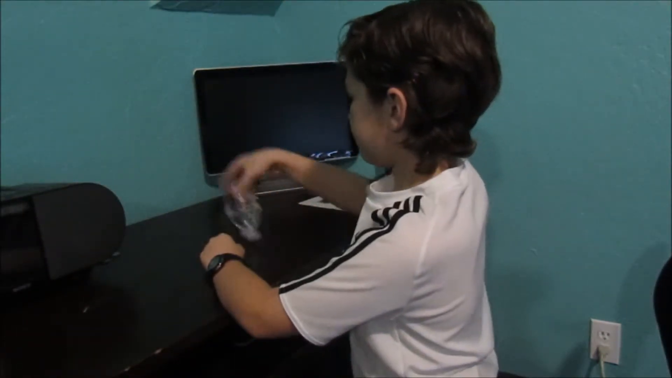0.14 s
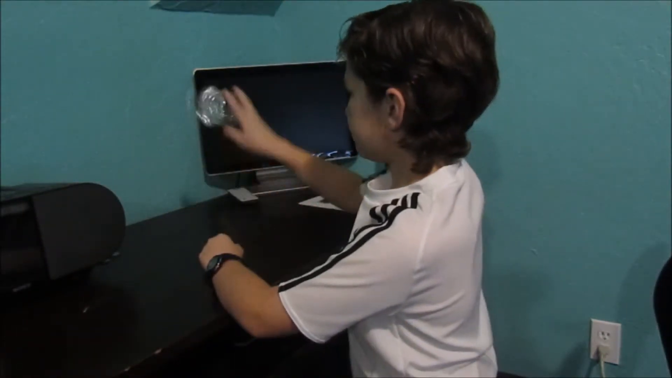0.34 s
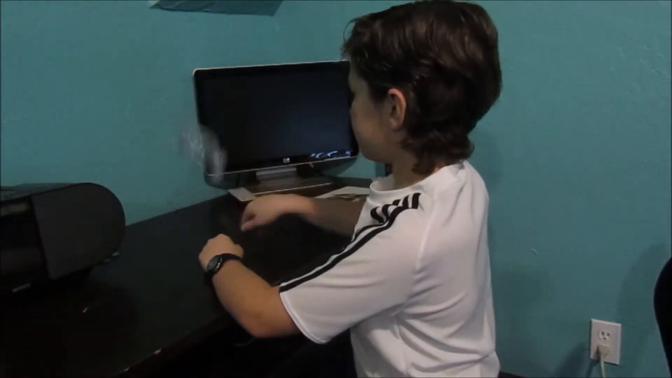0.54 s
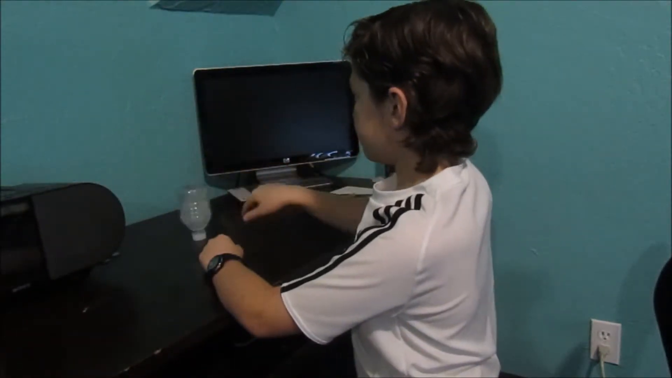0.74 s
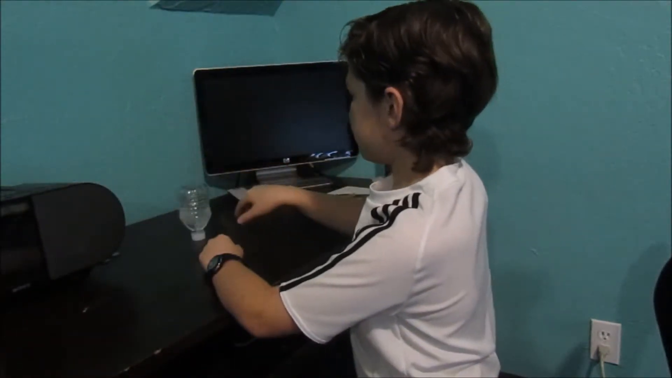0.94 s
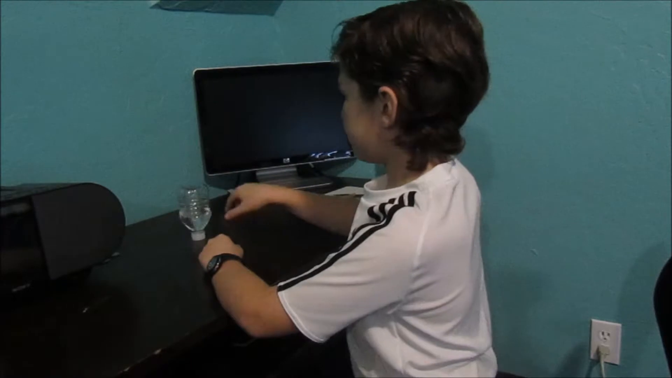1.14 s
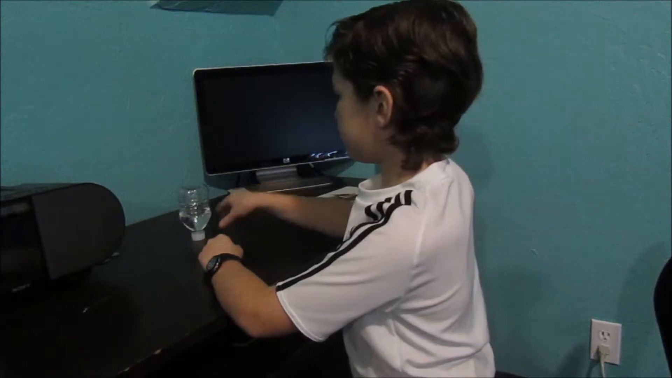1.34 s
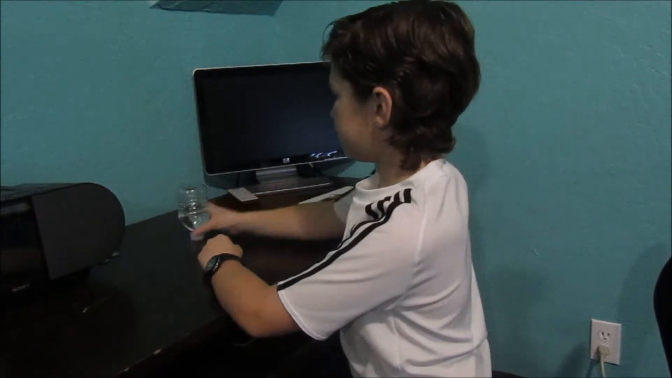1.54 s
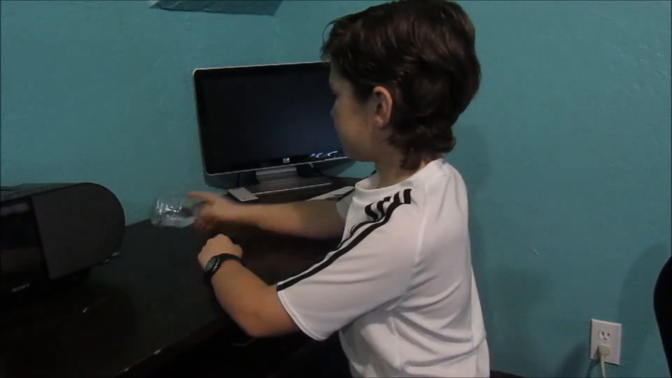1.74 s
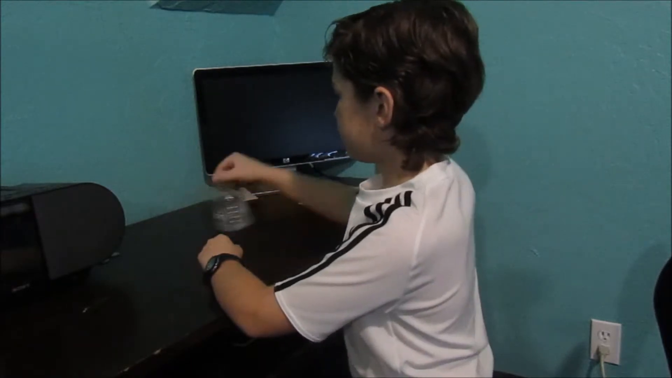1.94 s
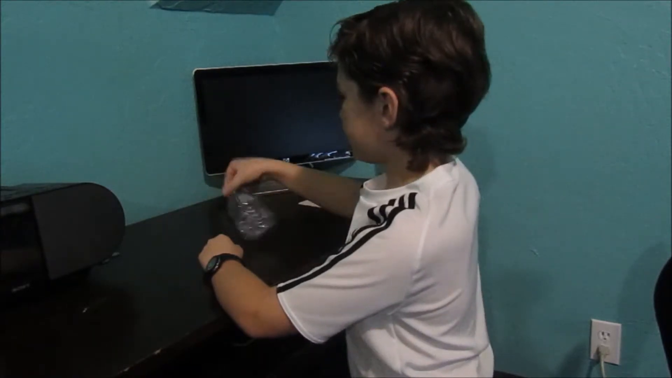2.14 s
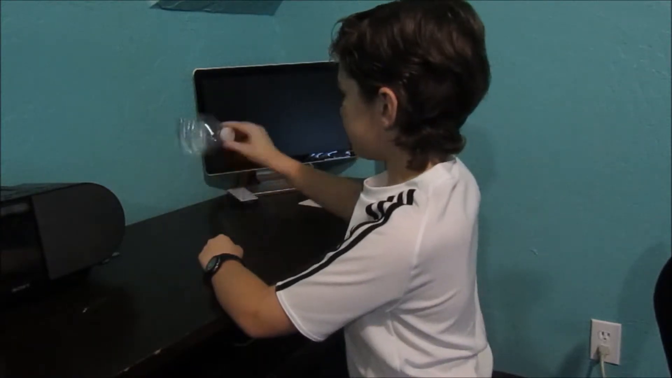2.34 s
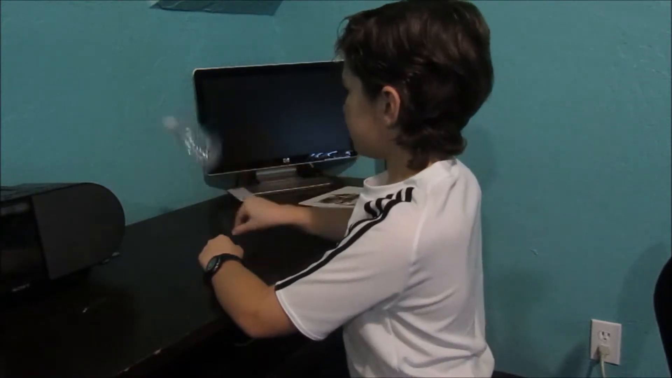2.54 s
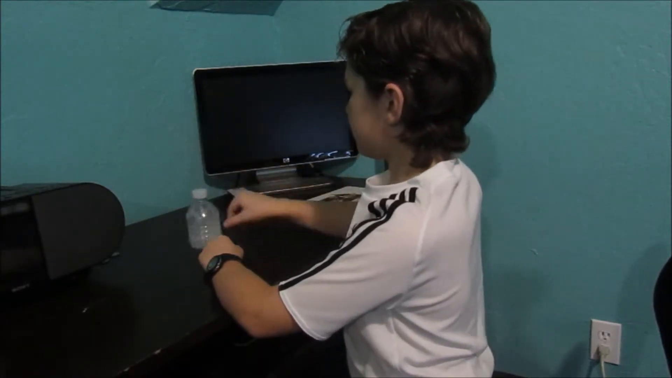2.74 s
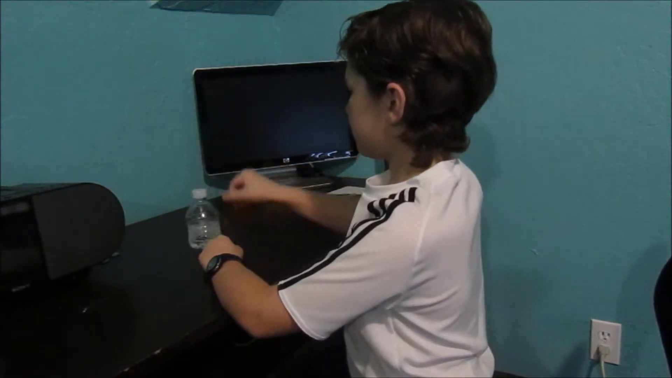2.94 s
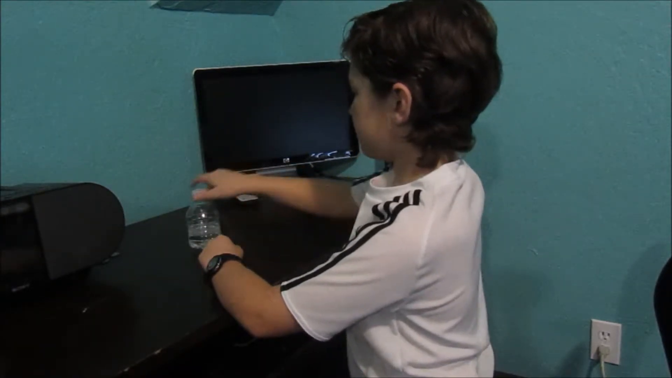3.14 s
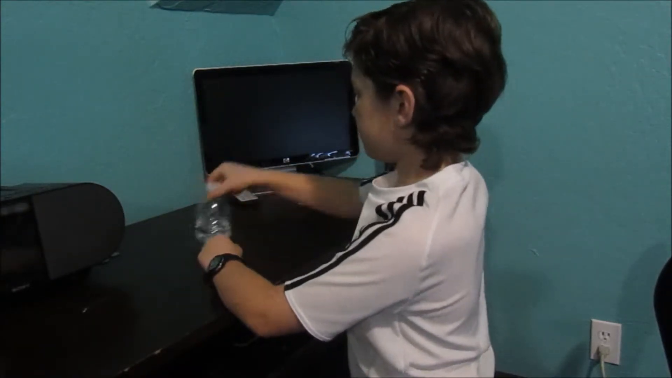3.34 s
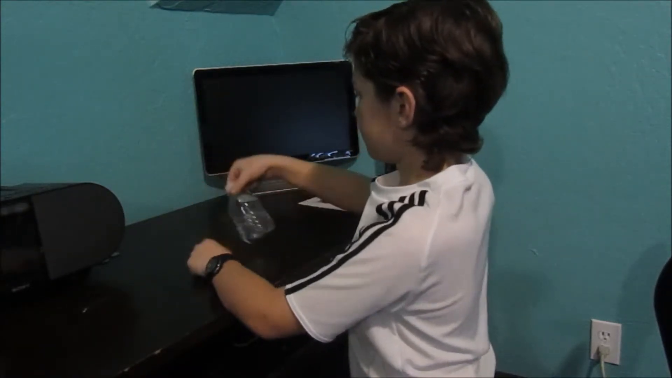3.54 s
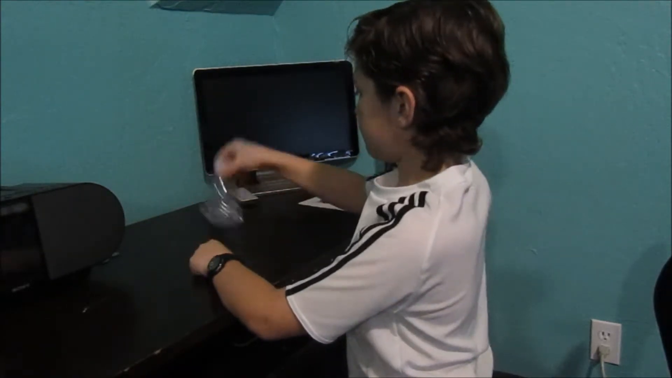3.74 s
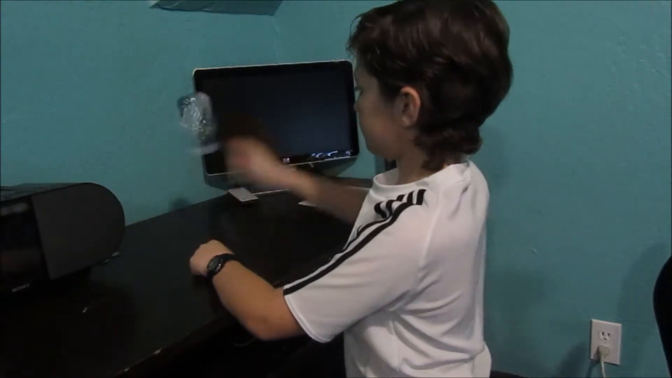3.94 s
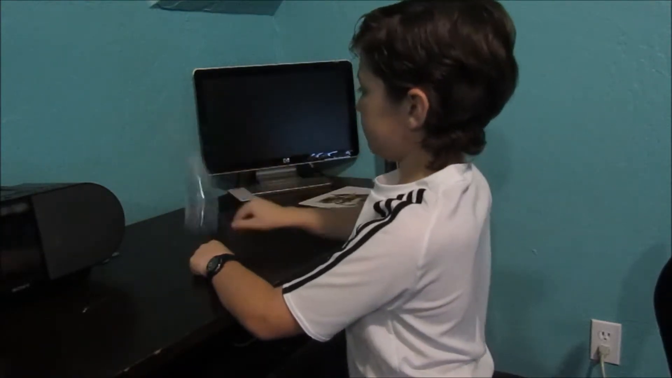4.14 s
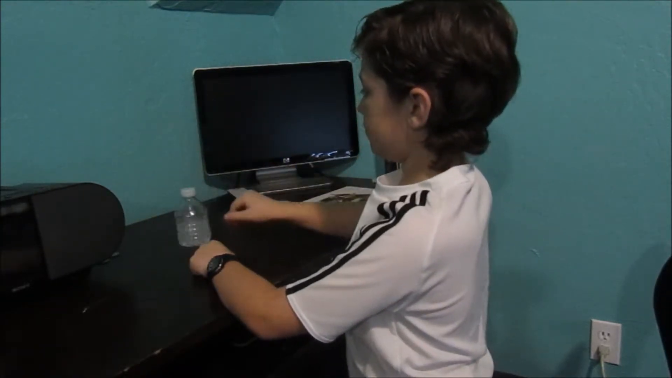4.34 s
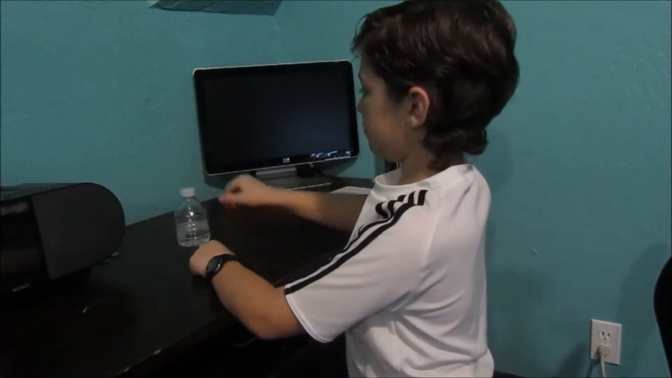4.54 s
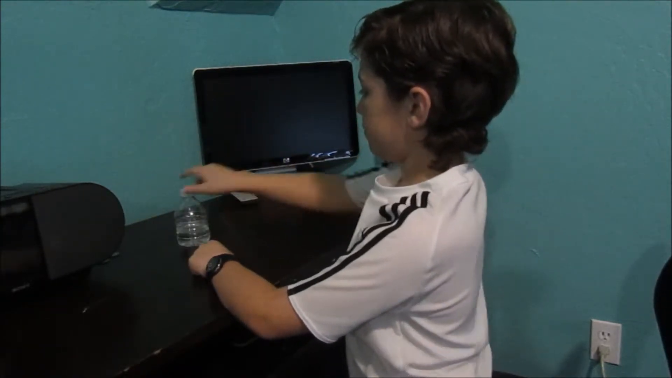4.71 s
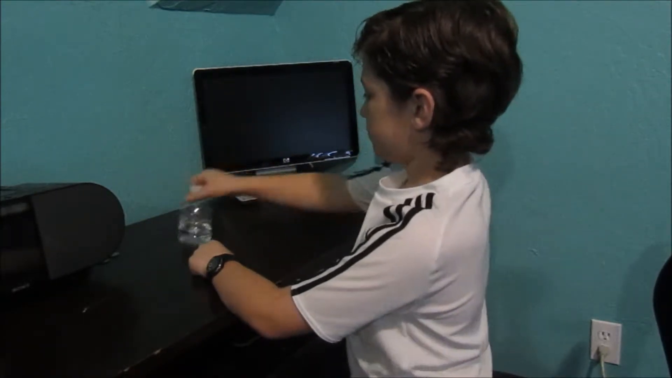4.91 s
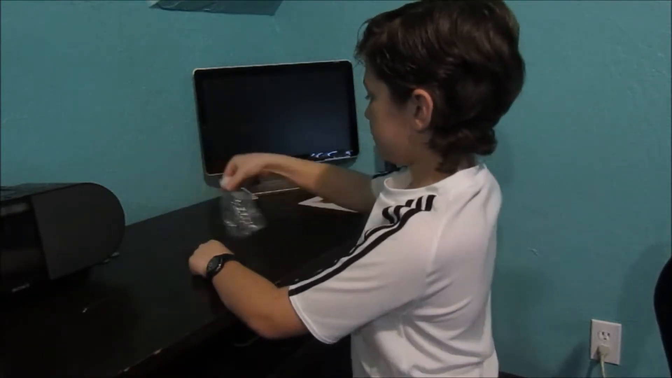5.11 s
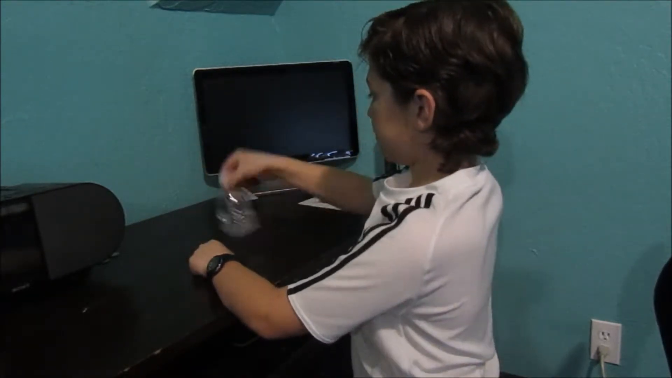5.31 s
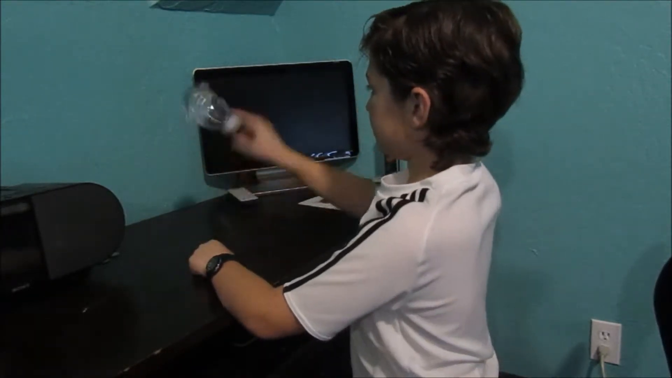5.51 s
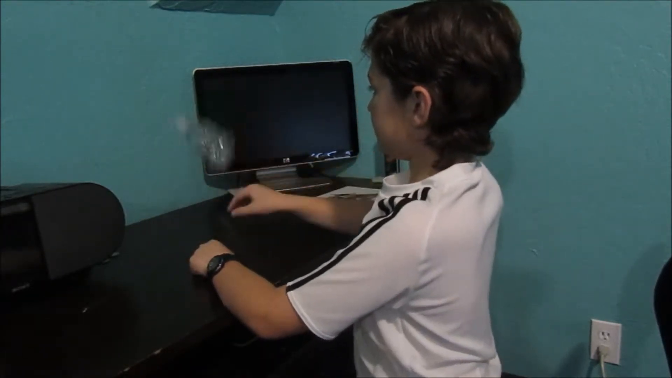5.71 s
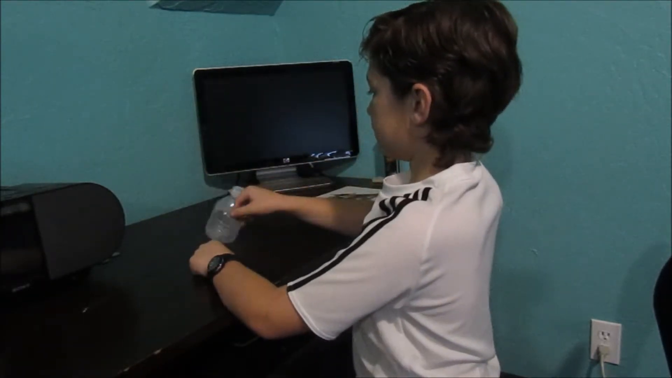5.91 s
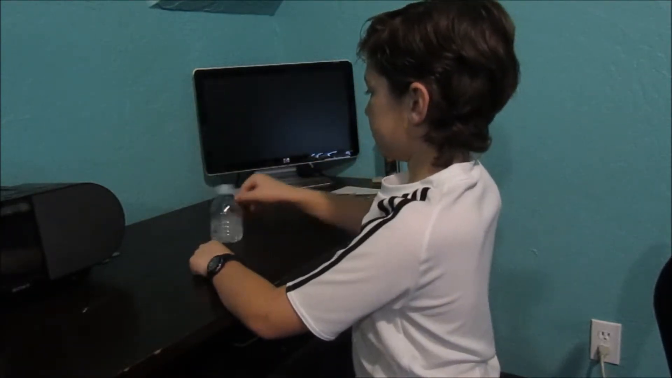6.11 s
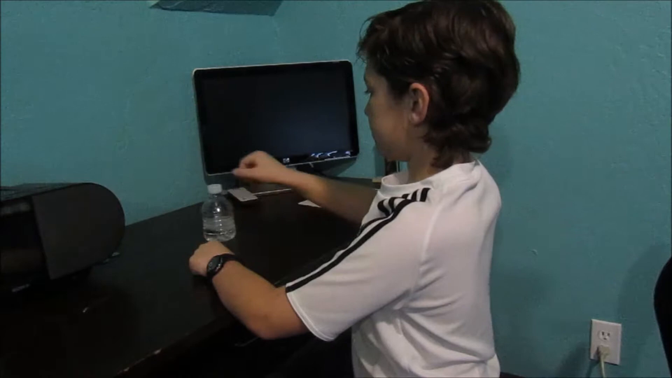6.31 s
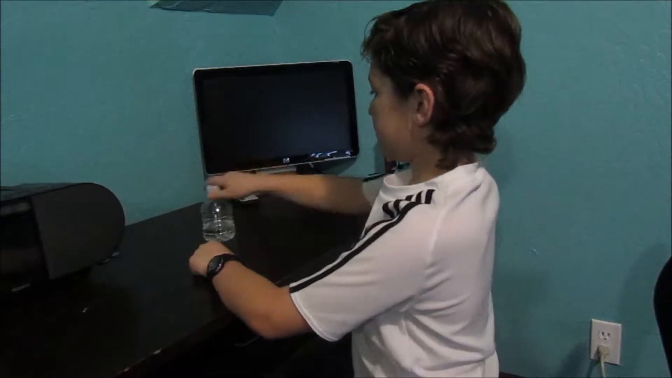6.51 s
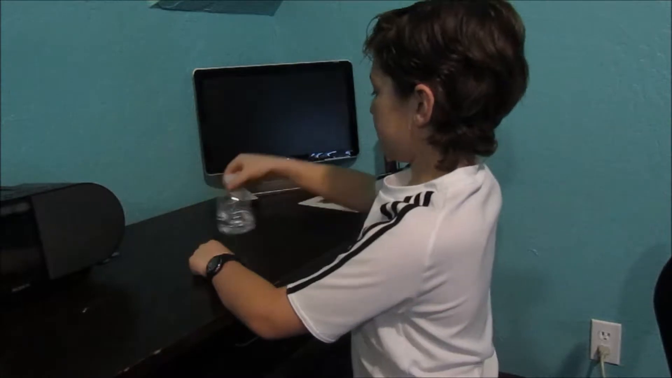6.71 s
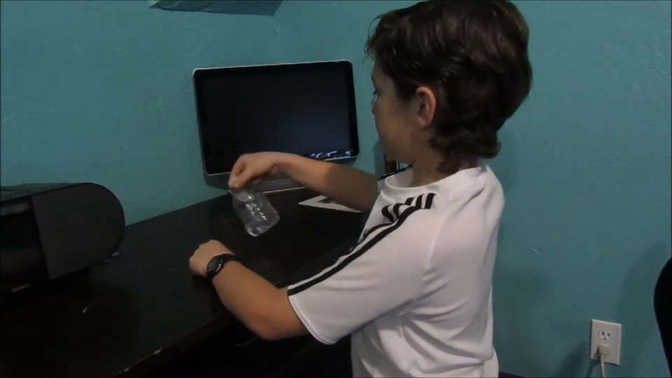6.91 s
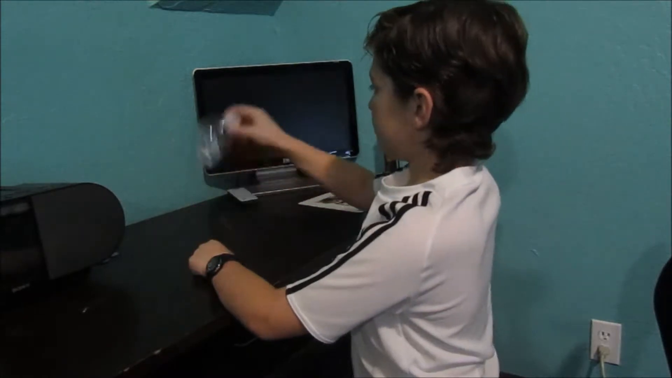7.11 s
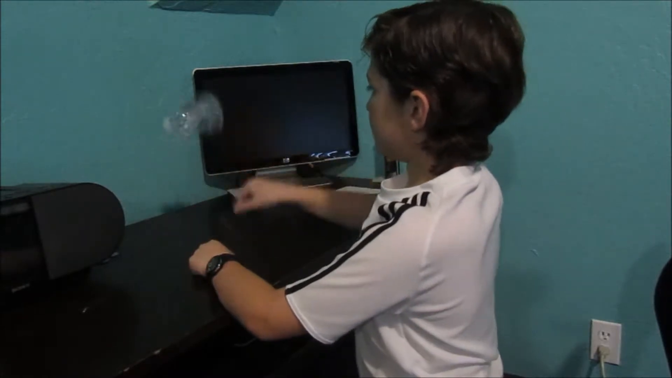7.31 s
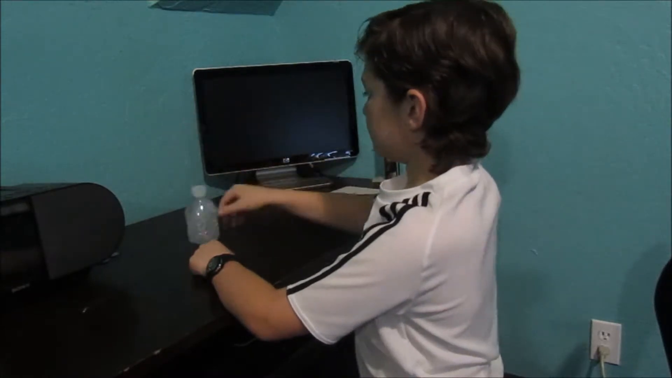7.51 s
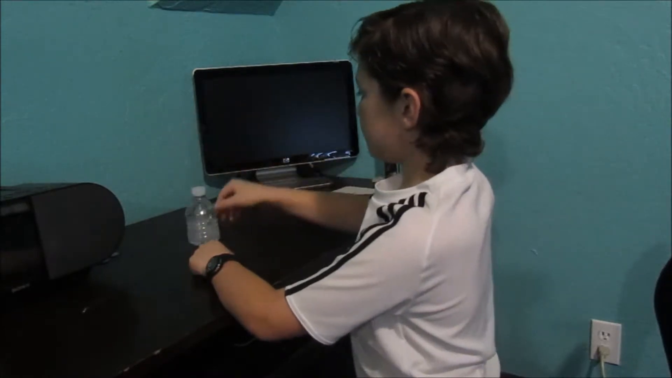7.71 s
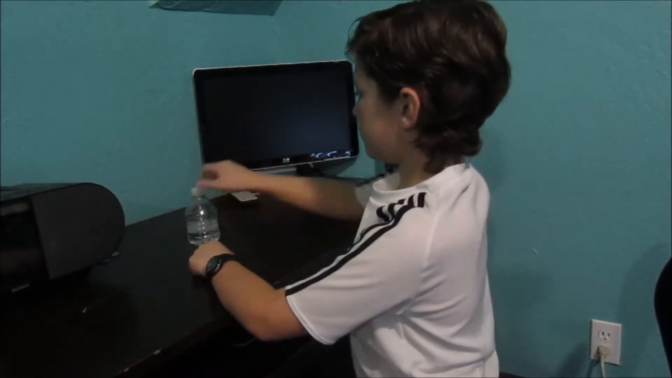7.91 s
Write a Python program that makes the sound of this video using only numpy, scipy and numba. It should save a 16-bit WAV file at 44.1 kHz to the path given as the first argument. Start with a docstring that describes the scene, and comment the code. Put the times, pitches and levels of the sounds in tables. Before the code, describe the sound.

A small camera close by in a bare-walled room picks up low hiss, a very faint high whine and tiny paired lens-motor ticks throughout. A knock and low hollow boom fade at the very start. At 0.45 s water slaps inside a plastic bottle, and at 0.6 s it hits the wooden desk with the loudest, sharpest crack. Hands brush the wood at 1.5 s, thin plastic crinkles from 1.8 to 1.95 s. A click of release at 2.4 s leads to a fuller thud at 2.65 s. Soft taps follow near 3.1 and 3.5 s; water surges at 4.1 s into a landing at 4.17 s with quick rocking knocks. Another slap at 5.7 s, thump at 5.84 s, lighter double knock around 6.16 s. Plastic snaps near 7 s, a slap at 7.37 s, final bright thud at 7.5 s, small crinkles, a faint hand bump at 8 s. Each hit has a short rattle and echo.

```python
"""Bottle flips on a desk

A part-filled plastic bottle is flipped five times and lands on a wooden desk in a small bare room.
Blows ring the desk panel, the thin wall cracks and clicks, water slaps inside, hands thump the wood:
each is a short push or noise burst that rings decaying resonances. A small camera adds hiss, a whine and
double ticks; its gain control ducks when the sound is loud and creeps back."""
import sys
import numpy as np
from scipy import signal
from scipy.fft import rfft, irfft
from scipy.io import wavfile
from scipy.ndimage import uniform_filter1d, map_coordinates
from numba import njit

SR = 44100
rng = np.random.default_rng(int(sys.argv[2]) if len(sys.argv) > 2 else 0)


def ratio(d):
    """dB to gain"""
    e = np.asarray(d, float) / 20
    return 10 ** e


def wav_out(sig):
    """Save sig, one row per channel (or a flat mono array), as 16-bit PCM at SR to the path in sys.argv[1]."""
    wavfile.write(sys.argv[1], SR, np.round(np.clip(np.atleast_2d(sig).T, -1, 1) * 32767).astype(np.int16))


N = 355446  # samples in the scene


def colour(x, points):
    """Filter with the gains of (pitch_hz, level_db) points; it never answers before its input."""
    hz, db = np.transpose(points)
    grid = np.arange(1, 4098) * SR / 8194
    log_gain = np.interp(np.log(grid), np.log(hz), db) * np.log(10) / 20
    # folding the cepstrum forward puts the whole response after its input
    cepstrum = irfft(log_gain)
    cepstrum[1:4096] *= 2
    cepstrum[4097:] = 0
    return signal.fftconvolve(x, irfft(np.exp(rfft(cepstrum))))[:len(x)]


def ring(x, modes):
    """Sum of decaying resonances, neighbours in opposite sign; t60_s is the time to fall by 60 dB."""
    out = 0
    for k, (hz, db, t60) in enumerate(modes):
        pole = np.exp(2j * np.pi * hz / SR - np.log(1000) / (t60 * SR))
        resonance = signal.lfilter([1], [1, -pole], x).imag
        out = out + (-1) ** k * ratio(db) * resonance
    return out


def vary(modes, amount=1):
    """The same modes under another grip or load: each a little higher or lower, stronger or weaker."""
    chance = amount * rng.standard_normal((len(modes), 2))
    return [(hz * (1 + 0.04 * u), db + 3 * v, t60) for (hz, db, t60), (u, v) in zip(modes, chance)]


def band(x, hz, octaves):
    """Band-pass around hz, rms kept near 1 for white noise."""
    low = hz * 2 ** (-octaves / 2)
    high = min(hz * 2 ** (octaves / 2), SR / 2.2)
    sos = signal.butter(2, [low, high], "band", fs=SR, output="sos")
    return signal.sosfilt(sos, x) / np.sqrt(2 * (high - low) / SR)


def add(track, s, x):
    """Mix x into track from time s in seconds."""
    i = int(s * SR)
    track[i:i + len(x)] += x[:max(len(track) - i, 0)]


def push(ms):
    """Contact force: a smooth hump of unit area; softer contact lasts longer."""
    hump = np.sin(np.pi * np.clip(np.arange(1024) / (ms * SR / 1000), 0, 1)) ** 2
    return hump / hump.sum()


def fade(ms):
    """Exponential die-away, down to 37 % after ms."""
    return np.exp(-np.arange(8192) / (ms * SR / 1000))


def crackle(shape):
    """Noise under a loudness shape, evened out so that no pitch stands out."""
    x = rng.standard_normal(len(shape)) * shape
    for _ in range(5):
        spectrum = rfft(x)
        flat = irfft(spectrum / np.abs(spectrum))
        loudness = np.sqrt(np.abs(uniform_filter1d(flat ** 2, size=48)) + 1e-12)
        x = shape * flat / loudness
    return flat * (shape > 1e-3) * np.sqrt(np.sum(shape ** 2))


# hollow boom dying away from the start, pitch and level before small random changes:
# pitch_hz [Hz], level_db [dB], t60_s [s]
BOOM_MODES = [(111.5, -39, .4), (222, -26, 0.31), (281, -19, 0.26), (302, -39, 0.37), (430, -29.5, 0.25),
              (540, -32.5, 0.29)]


def opening_boom():
    """A few low rings, already sounding at the first moment, that only decay."""
    start = np.zeros(N)
    start[0] = 1
    return ring(start, vary(BOOM_MODES, 0.5))


# relative colour of room air and camera hiss: pitch_hz [Hz], level_db [dB per Hz]
HISS_COLOUR = [(15, -9), (40, 9), (105, -3), (160, -4), (330, -7), (700, -11.5), (1300, -10.5),
               (1700, -16.5), (3000, -21.5), (7300, -24), (11000, -30.5), (16000, -38)]
# narrow bands of noise: pitch_hz [Hz], width_hz [Hz], level_db [dB]
HUMS = [(103.7, 8.9, -69), (395.8, 18, -75), (1149, 66, -70)]
HISS_DB = -58.5
WHINE_HZ, WHINE_DRIFT_HZ, WHINE_DB = 11770, 12, -83  # the drift and the level are rms


def hush():
    """Smooth hiss with a few narrow hums and a thin high whine that drifts a little."""
    air = colour(rng.standard_normal(N), HISS_COLOUR)
    out = ratio(HISS_DB) * air / air.std()
    for hz, width, db in HUMS:
        out = out + ratio(db) * band(rng.standard_normal(N), hz, np.log2(1 + width / hz))
    drift = uniform_filter1d(rng.standard_normal(N), size=2000)
    pitch = WHINE_HZ + WHINE_DRIFT_HZ * drift / drift.std()
    whine = np.sqrt(2) * np.sin(2 * np.pi * np.cumsum(pitch) / SR)
    return out + ratio(WHINE_DB) * whine


# another edge of the base comes down as the bottle rocks or tips back:
# start_s [s], contact_db [dB], weight_db [dB], crack_db [dB]
ROCKS = [(0.001, -17, -24, -23.5), (0.6235, -6, -23, -6), (2.658, -12, -52, -39), (4.176, -17, -12.5, -10),
         (4.204, -22, -17, -22), (4.251, -21, -31, -34), (4.32, -35.5, -18, -30), (5.845, -26, -17, -15),
         (6.186, -34, -6, -43), (6.201, -25.5, -17.5, -41), (7.508, -11, -4.5, -23)]
# the bottle lands on its base: start_s [s], contact_db [dB], contact_ms [ms], weight_db [dB],
# crack_db [dB], rattle_db [dB], favoured panel pitch_hz [Hz]
LANDINGS = [(0.619, 2, 0.51, -22, -2, -28, 452), (2.649, -8.5, 0.97, -3, -6.5, -38.5, 170),
            (4.1701, -5, 0.87, -7, -8.5, -33.5, 235), (5.837, -10.5, 0.76, -2, -4.5, -31, 468),
            (6.1557, -17, 0.87, -12, -34, -44.5, 248), (7.4957, -14.5, 0.81, -23, -9, -30, 747)]
# hands and fingers meet the wood: start_s [s], contact_db [dB], contact_ms [ms], weight_db [dB]
HANDS = [(1.536, -38, 2.8, -37), (1.631, -47, 1.1, -58), (3.095, -53, 1.53, -49), (3.18, -73.5, 2.7, -31),
         (3.535, -36, 0.9, -44.5), (4.799, -53, 2.17, -27.5), (6.509, -44.5, 1.3, -26),
         (8.03, -45, 2.3, -37)]
ROCK_CONTACT_MS, ROCK_CHATTER_MS = 0.94, 5
HAND_RUB_DB = -50  # hands take this in place of a crack level


def blows():
    """All contacts with the desk: start_s, contact_db, contact_ms, weight_db, crack_db, chatter_ms."""
    rows = []
    for s, contact_db, weight_db, crack_db in ROCKS:
        rows.append((s, contact_db, ROCK_CONTACT_MS, weight_db, crack_db, ROCK_CHATTER_MS))
    landings = [row[:-2] for row in LANDINGS]
    hands = [(*hand, HAND_RUB_DB) for hand in HANDS]
    for s, contact_db, ms, weight_db, crack_db in landings + hands:
        # softer contact chatters longer
        rows.append((s, contact_db, ms, weight_db, crack_db, 7.5 * ms ** 1.5))
    return rows


# desk panel resonances, before each blow shifts them a little: pitch_hz [Hz], level_db [dB], t60_s [s]
DESK_MODES = [(110, -6, 0.061), (212, -5.5, 0.031), (229.8, -5.5, 0.05), (274, 0, 0.04), (325, -0.5, 0.035),
              (379.6, -4, 0.08), (389, -0.5, 0.031), (518, -3.5, 0.059), (539.8, -1, 0.025),
              (619, 0, 0.029), (698, -5, 0.033), (739, 1, 0.02), (872.5, -6, 0.048), (1097, -8.5, 0.048),
              (1310, -18.5, 0.0051), (1760, -10.5, 0.0023), (2523, -15, 0.0044), (2820, -12.5, 0.0053)]
# colour of cracking plastic: pitch_hz [Hz], level_db [dB]
CRACK_COLOUR = [(400, 6), (1000, 5.5), (2500, 3), (4000, -3.5), (7000, -10), (11000, -16), (16000, -32)]
SPOT_DB, SPOT_OCTAVES = 3.5, 0.88  # boost at a landing's favoured pitch, and how far it spreads
SHELL_DB = -38  # the crack of a blow rings the bottle's upper modes


def panel_at(s):
    """Panel modes for one blow: spot and load shift them, and those near the favoured pitch are stronger."""
    landed, favoured = np.transpose(LANDINGS)[[0, -1]]
    spot_hz = favoured[np.argmin(np.abs(landed - s))]  # that of the landing nearest in time
    modes = []
    for (hz, db, t60), (u, v) in zip(DESK_MODES, rng.standard_normal((len(DESK_MODES), 2))):
        hz = hz * (1 + 0.02 * u)
        boost_db = SPOT_DB * np.exp(-(np.log2(hz / spot_hz) / SPOT_OCTAVES) ** 2)
        modes.append((hz, db + 2.2 * v + boost_db, t60))
    return modes


def desk():
    """Each blow is a hard contact that chatters, with slower weight behind it; thin plastic cracks on top."""
    wood, crack = np.zeros(N), np.zeros(N)
    for s, contact_db, ms, weight_db, crack_db, chatter_ms in blows():
        # a soft hand settles gradually and has little first strike
        settle = fade(chatter_ms) * (1 - fade(ms ** 3))
        contact = 0.11 * crackle(settle)
        contact[0] = min(1, ms ** -2)
        hard = ratio(contact_db) * np.convolve(contact, push(ms))
        force = np.pad(hard, (0, 8192))  # room for the ring to die away
        add(force, 0, ratio(weight_db) * np.convolve(contact, push(5.2)))
        add(wood, s, ratio(-5.0) * ring(force, panel_at(s)))
        # the contact itself is heard as a sharp dip and rise of pressure
        add(wood, s, -ratio(38.5) * np.diff(hard))
        snap = ratio(crack_db) * crackle(settle)
        shell_modes = vary(BOTTLE_MODES + WALL_MODES)[6:]
        add(crack, s, snap + ratio(SHELL_DB) * ring(snap, shell_modes))
    return wood + colour(crack, CRACK_COLOUR)


# lowest standing waves between the walls: pitch_hz [Hz], level_db [dB], t60_s [s]
ROOM_MODES = [(108.6, -56.5, 0.39), (131, -59.5, .25), (224.3, -58, 0.45), (385, -58.5, .35),
              (595, -59.5, 0.44)]
# how long the echo lasts in each pitch range: pitch_hz [Hz], t60_s [s]
ECHO_BANDS = [(350, 0.38), (1000, 0.33), (2800, 0.26), (6000, 0.29), (12000, 0.033)]
ECHO_DB, FIRST_WALL_MS = -4, 2.7


def room(x):
    """Bare walls: a dense tail builds up to the first wall, loses its top treble first; standing waves join."""
    t = np.arange(int(0.6 * SR)) / SR
    tail = 0
    for hz, t60 in ECHO_BANDS:
        tail = tail + band(rng.standard_normal(len(t)), hz, 1.66) * hz ** 0.5 * ratio(-60 * t / t60)
    # no narrow pitch range is favoured by the walls
    spectrum = rfft(tail)
    power = np.abs(spectrum) ** 2
    evening = np.sqrt(uniform_filter1d(power, size=400) / uniform_filter1d(power, size=60))
    tail = irfft(spectrum * evening, len(t))
    build_up = np.clip(1000 * t / FIRST_WALL_MS, 0, 1) ** 2
    fade_out = np.clip(10 * (0.5 - t), 0, 1)
    tail = tail * build_up * fade_out
    tail = tail / np.sqrt(np.sum(tail ** 2))
    return ratio(ECHO_DB) * signal.fftconvolve(x, tail)[:N] + ring(x, ROOM_MODES)


# lens motor runs on the step clock: first_beat [beats], steps [count], mean pace [beats per step]
MOTOR_RUNS = [(4, 5, 2), (21, 10, 2.28), (47.4, 3, 2.8), (55.3, 4, 2.3), (71.2, 3, 2.5), (102, 1, 2),
              (110, 3, 2), (117.4, 4, 2.6), (127, 5, 3), (141, 2, 2), (152, 1, 2), (156, 5, 3), (170, 3, 3),
              (178, 2, 2), (196, 3, 2)]
# camera shell resonances: pitch_hz [Hz], level_db [dB], t60_s [s]
SHELL_MODES = [(2524, -1.5, 0.032), (3540, -4.5, 0.049), (2050, -7, 0.011)]
CLOCK_S, CLOCK_START_S, TICK_PAIR_S = 0.04, 0.0305, 0.016
TICK_DB = -50.5


def lens_motor():
    """Every step is a start tick and a stop tick in the camera shell."""
    ticks = np.zeros(N)
    for first, steps, pace in MOTOR_RUNS:
        for beat in np.round(first + pace * np.arange(steps)):
            start, stop = ratio(TICK_DB + 0.5 * rng.standard_normal(2))
            s = CLOCK_START_S + beat * CLOCK_S
            add(ticks, s, start * push(0.34))
            add(ticks, s + TICK_PAIR_S, stop * push(0.36))
    return ring(ticks, SHELL_MODES)


# spray patters on the wall: start_s [s], level_db [dB], fade_ms [ms]
SPRAYS = [(0.435, -53, 6.4), (0.454, -45.5, 7.5), (2.515, -46.5, 4.8), (4.018, -55, 25), (4.044, -56, 16),
          (5.303, -52.5, 4.5), (5.695, -49.5, 15.3), (7.369, -44.5, 11.8)]
# sound of every spray: pitch_hz [Hz], width [octaves], body_db [dB]
SPRAY_SOUND = (3200, 3.1, -30)
# water slaps the ends of the bottle: start_s [s], level_db [dB], pitch_hz [Hz], width [octaves], fade_ms [ms]
SLAPS = [(0.454, -30.5, 1178, 0.99, 5.5), (0.49, -45, 1244, 0.42, 4.56), (2.513, -50.5, 635, 0.56, 7),
         (2.529, -53.5, 332, 0.71, 9), (2.557, -49.5, 1020, 1.5, 5.7), (5.699, -31.5, 422, 1.84, 2.03),
         (7.369, -23.5, 436, 1.15, 0.28)]
# dents in the wall snap under the fingers: start_s [s], level_db [dB], pitch_hz [Hz], width [octaves], fade_ms [ms]
SNAPS = [(1.783, -35, 2315, 3.4, 8.1), (1.809, -51, 5500, .3, 4.6), (1.841, -41, 3000, 3.1, 3.2),
         (1.849, -51, 4300, 0.29, 2.9), (1.895, -49.5, 5300, .2, 4), (1.898, -45.5, 2180, 1.25, 6.2),
         (1.924, -45, 1980, 2.2, 5.4), (1.927, -54.5, 3820, 0.15, 5), (1.952, -54, 3470, 0.63, 3),
         (4.304, -68, 9000, 1.3, 2.3), (4.4, -50, 5700, 0.85, 3.1), (6.86, -59, 6500, 0.73, 3.5),
         (6.988, -39.5, 2394, 1.27, 2.6), (7.737, -49, 1590, 1.5, 3.9), (7.78, -47, 5200, 0.4, 3.7)]
# fingers let the cap go, a hollow note and a click: start_s [s], note_db [dB], click_db [dB], click pitch_hz [Hz]
RELEASES = [(2.396, -54.5, -44.5, 2510), (3.928, -56, -45.5, 3115), (5.563, -53, -53, 2350),
            (7.259, -52.5, -44, 2780)]
# sound of every release note: pitch_hz [Hz], width [octaves], fade_ms [ms], body_db [dB]
NOTE_SOUND = (664, 0.3, 12, -15)
# sound of every release click: width [octaves], fade_ms [ms], body_db [dB]
CLICK_SOUND = (0.18, 5.9, -10)
SLAP_BODY_DB, SNAP_BODY_DB = 2.5, 3
NOTE_LEAD_S = 0.00692  # the note starts this long before its click


def bursts():
    """All bursts in the bottle: start_s, level_db, pitch_hz, width in octaves, fade_ms, body_db."""
    rows = [(*slap, SLAP_BODY_DB) for slap in SLAPS]
    rows += [(*snap, SNAP_BODY_DB) for snap in SNAPS]
    spray_hz, spray_octaves, spray_body_db = SPRAY_SOUND
    rows += [(s, db, spray_hz, spray_octaves, ms, spray_body_db) for s, db, ms in SPRAYS]
    for s, note_db, click_db, click_hz in RELEASES:
        rows.append((s - NOTE_LEAD_S, note_db, *NOTE_SOUND))
        rows.append((s, click_db, click_hz, *CLICK_SOUND))
    return rows


# air and wall of the bottle, before grip and glide: pitch_hz [Hz], level_db [dB], t60_s [s]
BOTTLE_MODES = [(221.4, -5.5, 1), (265, -3, 0.16), (345, -5, 0.15), (388, -0.5, 0.07), (615, 0, 0.027),
                (840, -10.5, 0.21), (1246, -7.5, 0.05), (1735, -6.5, 0.035), (2337, -9, 0.068),
                (2894, -4, 0.0078)]
BURST_ATTACK_MS = 0.24
BODY_SAG, BODY_SAG_S = 0.06, 0.08  # moving water lowers the pitch by this share, within about this time


def bottle():
    """Short noise bursts, partly heard dry and partly ringing the hollow body."""
    out = np.zeros(N)
    after = np.arange(16384) / SR
    # reading the ring faster at first makes it start sharp and settle on its own pitches
    sagging = (after + BODY_SAG * BODY_SAG_S * (1 - np.exp(-after / BODY_SAG_S))) * SR
    for s, db, hz, octaves, ms, body_db in bursts():
        shape = fade(ms) * (1 - fade(BURST_ATTACK_MS))
        burst = ratio(db) * band(crackle(shape), hz, octaves)
        body = ring(np.pad(burst, (0, len(burst))), vary(BOTTLE_MODES, 0.5))
        add(out, s, burst)
        add(out, s, ratio(body_db - 33) * map_coordinates(body, [sagging]))
    return out


# high modes of the thin wall, before the grip shifts them: pitch_hz [Hz], level_db [dB], t60_s [s]
WALL_MODES = [(2860, -1, 0.0039), (4460, 1.5, 0.0067), (5500, -0.5, 0.0034), (6670, 0.5, 0.0085),
              (8500, -2, 0.0064), (8640, -4, 0.0027)]
SPRAY_WALL_DB, CLICK_WALL_DB = -22, -26  # added to the level of each spray or click


def wall():
    """Spray and the fingers' clicks set the thin wall ticking at its high modes."""
    out = np.zeros(N)
    rows = [(s, db + SPRAY_WALL_DB, ms) for s, db, ms in SPRAYS]
    rows += [(s, click_db + CLICK_WALL_DB, CLICK_SOUND[1]) for s, _, click_db, _ in RELEASES]
    for s, db, ms in rows:
        burst = ratio(db) * rng.standard_normal(8192) * fade(ms)
        add(out, s, ring(burst, vary(WALL_MODES)))
    return out


RATTLE_TICKS, RATTLE_SPAN_MS, RATTLE_FADE_MS = 24, 160, 2
RATTLE_FALL_DB, RATTLE_SCATTER_DB = 26, 4  # fall over the span; random lift of single ticks


def rattle():
    """After a landing the wall rattles and water splashes down: scattered ticks, weaker as it settles."""
    out = np.zeros(N)
    for s, *_, rattle_db, _ in LANDINGS:
        for late, size, pitch in rng.random((RATTLE_TICKS, 3)):
            db = rattle_db - RATTLE_FALL_DB * late - RATTLE_SCATTER_DB * np.log(size)
            grit = rng.standard_normal(2048) * fade(RATTLE_FADE_MS)[:2048]
            tick = band(grit, 900 * 2 ** (2.3 * pitch), 0.9)
            add(out, s + 0.012 + late * RATTLE_SPAN_MS / 1000, ratio(db) * tick)
    return out


# water surging along the spinning bottle: time_s [s], level_db [dB], pitch_hz [Hz]
SURGE_PATH = [(3.928, -64, 294), (4.022, -52.5, 265), (4.07, -55.5, 223.8), (4.122, -44, 247.5),
              (4.165, -52.5, 254), (4.18, -77, 268)]


def water_surge():
    """Slowly wandering noise carried on a gliding low pitch."""
    s, db, hz = np.transpose(SURGE_PATH)
    t = np.arange(N) / SR
    swell = uniform_filter1d(rng.standard_normal((2, N)), size=600)
    turn = np.exp(2j * np.pi * np.cumsum(np.interp(t, s, hz)) / SR)
    level = ratio(np.interp(t, s, db, -150, -150))  # practically silent outside the path
    return level * (turn * (swell[0] + 1j * swell[1])).real / swell.std()


def scene():
    """Near sources with their room tail, over the opening boom, the steady floor and the lens motor."""
    near = desk() + bottle() + wall() + rattle() + water_surge()
    return (near + room(near) + opening_boom() + hush() + lens_motor())[None]


@njit
def gain_control(x, start_db, rise_db, fall_db, limit):
    """Gain creeps up steadily and is pushed down while the output passes the limit."""
    y, db = np.empty(len(x)), start_db
    for i in range(len(x)):
        y[i] = x[i] * 10 ** (db / 20)
        db += rise_db - fall_db * max(abs(y[i]) - limit, 0.)
    return y


def low_pass(x):
    """Removes everything above the highest recorded frequency."""
    return signal.sosfilt(signal.butter(12, 16520, fs=SR, output="sos"), x)


MIC_LOW_HZ, TOP_HZ = 75, 16000


def record(dry):
    """The microphone drops deep bass; then gain control, overload at full scale and a cut of the top."""
    mic = signal.sosfilt(signal.butter(2, MIC_LOW_HZ, "high", fs=SR, output="sos"), dry[0])
    # starts at -3 dB, rises 4.1 dB a second, falls 2600 dB a second per unit above 0.25
    level = gain_control(mic, -3.0, 4.1 / SR, 2600. / SR, 0.25)
    overloaded = np.clip(level, -1, 1)
    mix = signal.sosfilt(signal.ellip(8, 0.2, 60, TOP_HZ, fs=SR, output="sos"), overloaded)
    return low_pass(mix[None])


dry = scene()
out = record(dry)
wav_out(out)
```